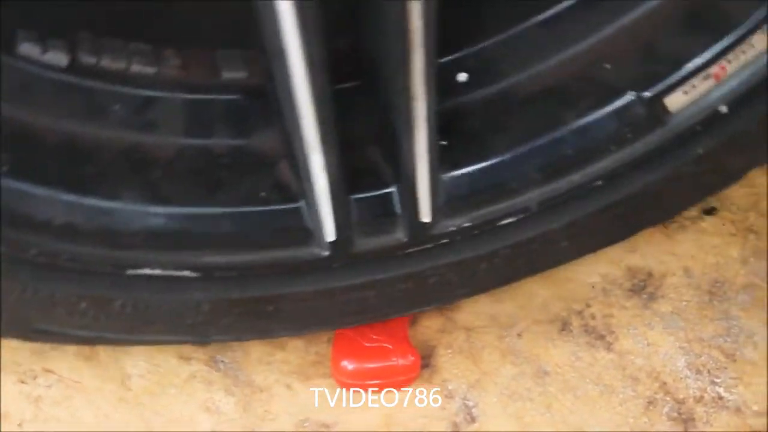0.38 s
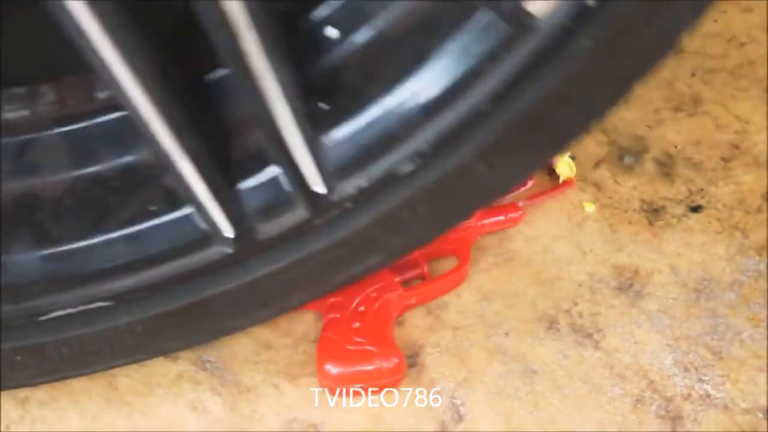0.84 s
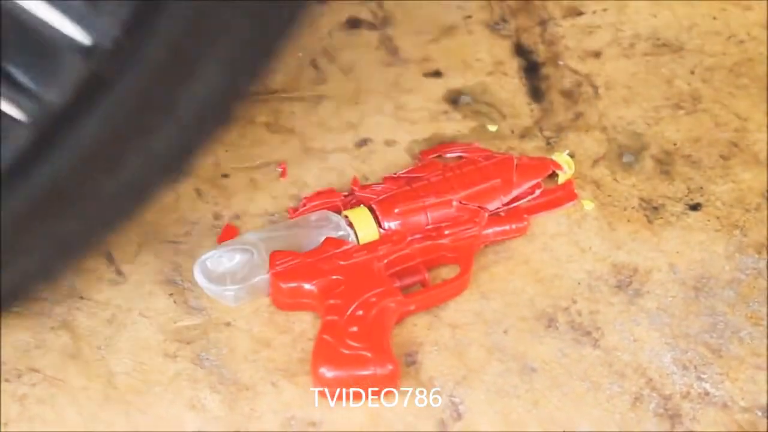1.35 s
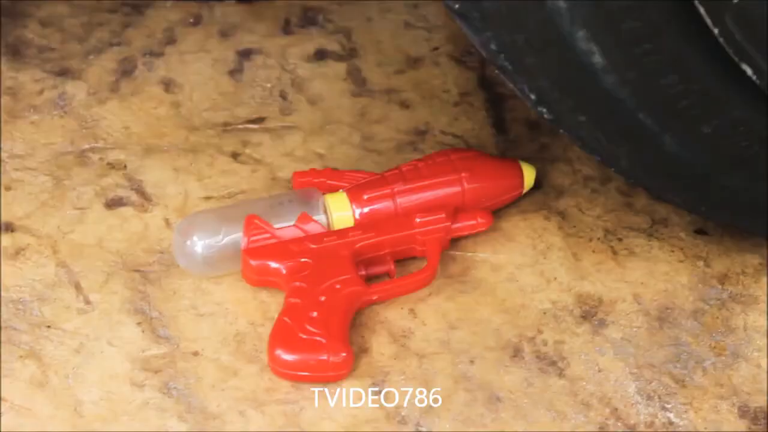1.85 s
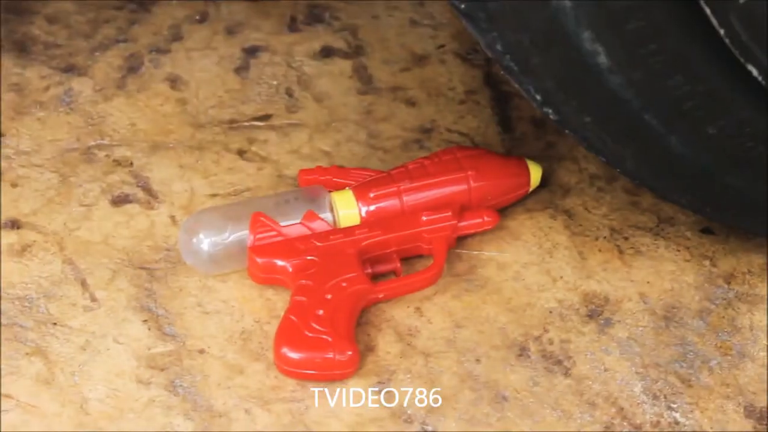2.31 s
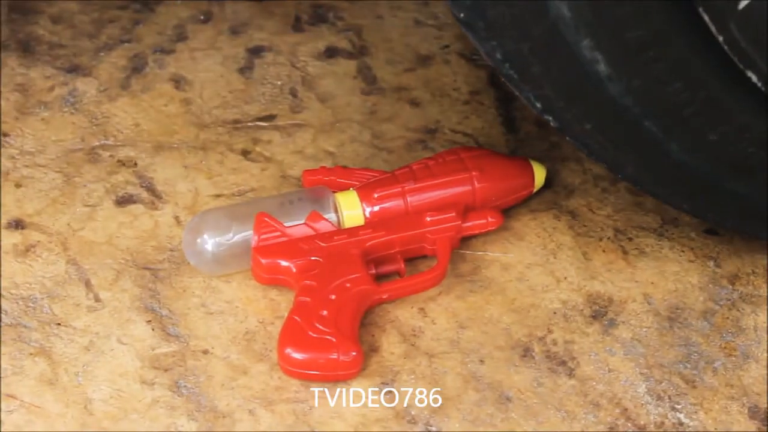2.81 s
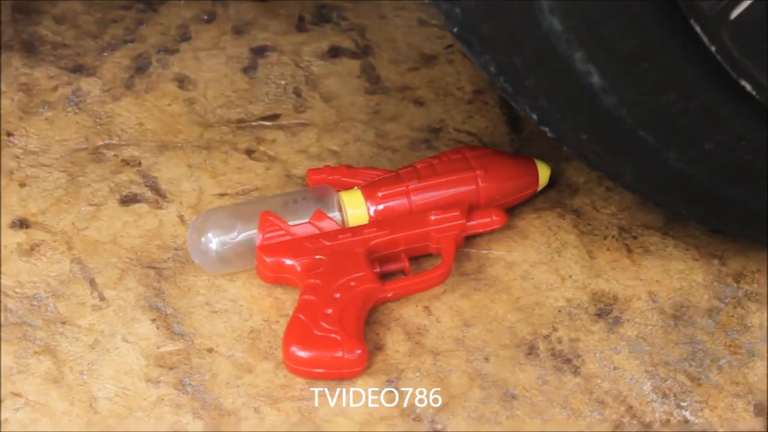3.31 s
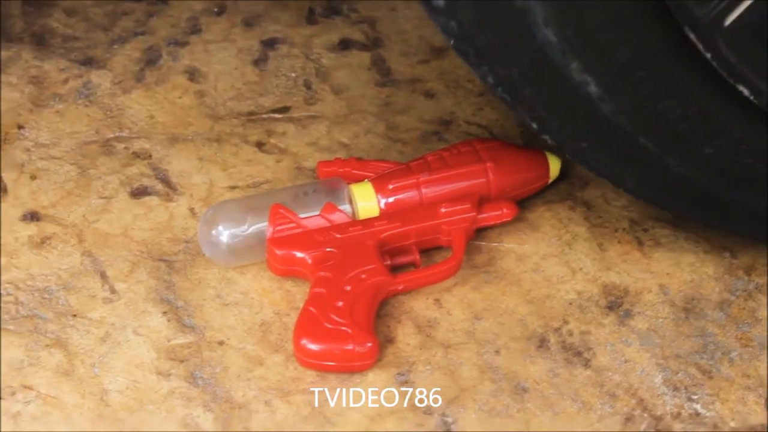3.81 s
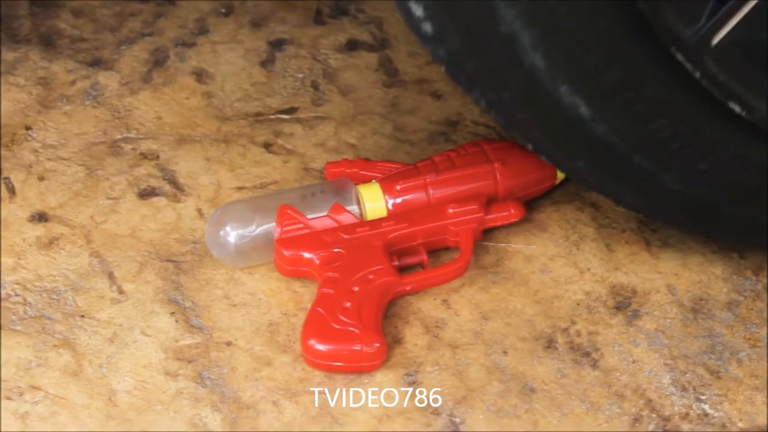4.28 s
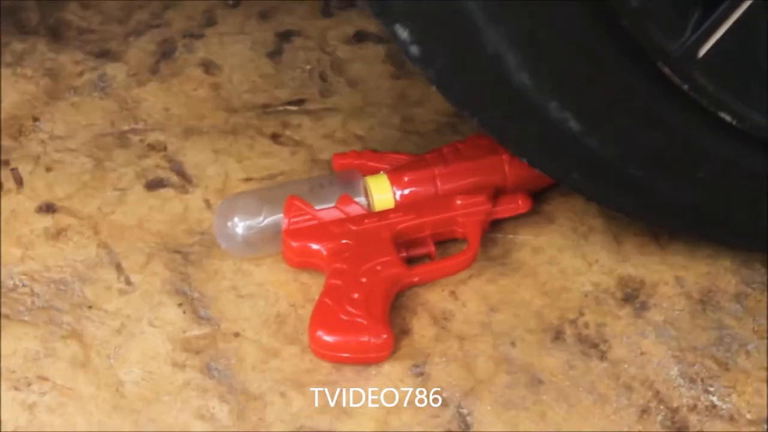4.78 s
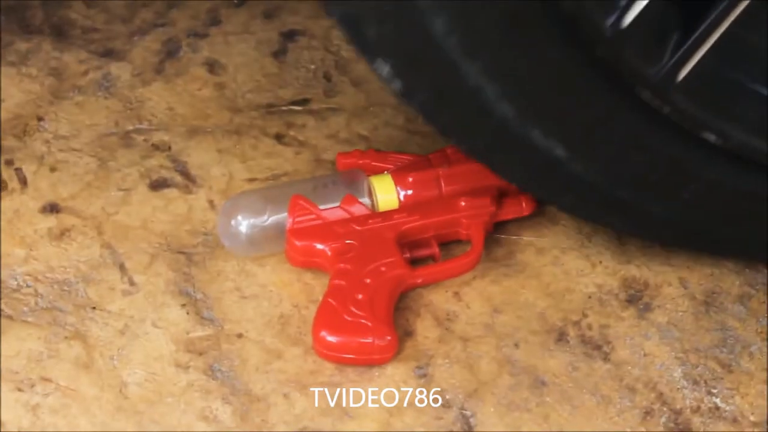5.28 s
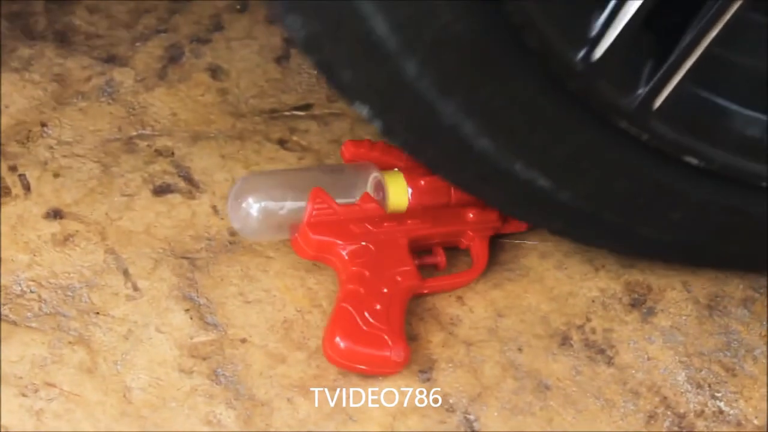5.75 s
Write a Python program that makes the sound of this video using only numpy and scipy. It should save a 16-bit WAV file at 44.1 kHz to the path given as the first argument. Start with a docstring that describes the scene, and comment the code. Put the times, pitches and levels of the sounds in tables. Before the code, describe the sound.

Sharp plastic cracks and rattles over a hissy idling car, a blink of silence, then the same idle slowed to a dark rumble before deep crunches.

```python
"""A hollow plastic toy snaps, crunches and rattles in a yard as an idling car rolls its tyre over it.
After a short silent cut a second crush plays at quarter speed, so engine, fan and cracks sound two octaves lower.
Snaps are noise bursts with ringing pieces; the grind and crackle are many tiny slips and breaks under the tyre.
The engine is shaped noise and wavering tones. The loudest snaps overload the recorder."""
import sys
import numpy as np
from scipy import signal
from scipy.fft import rfft, irfft, next_fast_len
from scipy.io import wavfile
from scipy.ndimage import uniform_filter1d, map_coordinates

SR = 44100
rng = np.random.default_rng(int(sys.argv[2]) if len(sys.argv) > 2 else 0)


def nominal_scale(level):
    """Amplitude ratio for a level in decibels (scalar or array-like)."""
    x = np.asarray(level, float) / 20
    return 10 ** x


def log_audio(samples):
    """Write samples as a 16-bit WAV file to the path given in sys.argv[1]."""
    # one column per channel
    frames = np.atleast_2d(samples).T
    # limit to full scale, then quantise
    limited = np.clip(frames, -1, 1)
    pcm = np.round(limited * 32767).astype(np.int16)
    wavfile.write(sys.argv[1], SR, pcm)


N = 270333  # length in samples

# the two shots: (start [s], end [s], playing speed [1 = full])
SHOT_TIMES = [(0, 1.812, 1), (1.876, 6.2, .25)]
# resonances of each shot's toy as heard: (pitch [Hz], width [Hz], relative level [dB])
SHELL_MODES = [
    [(499.4, 27, -3), (1034, 100, 3), (1270, 230, 0), (1548, 130, 3), (2100, 230, 2), (2583, 440, 5),
     (3786, 1100, -19.5), (4744, 120, -19.5), (6780, 1500, -20)],
    [(540, 78.8, -12.5), (764, 150, -1), (930, 200, 0.5), (1230, 140, -4), (1800, 500, -12),
     (2500, 190, -8), (2800, 340, -10), (3800, 640, -12.5), (4614, 380, -21.5)],
]


def unit(x):
    """Scales x to an rms of 1."""
    return x / np.sqrt(np.mean(x ** 2) + 1e-20)


def along(points, hz):
    """Reads a curve of (pitch [Hz], value) points on a logarithmic pitch axis."""
    point_hz, value = np.transpose(points)
    return np.interp(np.log(hz + 1), np.log(point_hz + 1), value)


def wobble(rate):
    """A smooth random curve through `rate` random points a second."""
    points = rng.standard_normal(int(N * rate / SR) + 4)
    return map_coordinates(points, [np.arange(N) * rate / SR])


def filtered(x, response):
    """Multiplies the spectrum of x by a response that depends on frequency."""
    size = next_fast_len(N + SR // 2)
    spectrum = rfft(x, size) * response(np.fft.rfftfreq(size, 1 / SR))
    return irfft(spectrum, size)[..., :N]


def resonant(x, modes):
    """Lets x shake a set of resonances, which ring on after each push; their signs alternate."""
    def response(f):
        total = 0
        for k, (hz, width, db) in enumerate(modes):
            total = total + (-1) ** k * nominal_scale(db) * 1j * f * width / (hz * hz - f * f + 1j * f * width)
        return total
    return filtered(x, response)


def narrow(hz, width_hz):
    """Noise through one narrow resonance, at rms 1: a breathy hum."""
    return unit(resonant(rng.standard_normal(N), [(hz, width_hz, 0)]))


def tones(hz, overtones, waver_db):
    """Sines at multiples of one pitch curve, each wavering in level on its own."""
    turn = 2 * np.pi * np.cumsum(hz) / SR
    total = np.zeros(N)
    for multiple, db in overtones:
        level = np.sqrt(2) * nominal_scale(db + waver_db * wobble(11.0))  # sqrt(2) turns rms into peak
        total += level * np.sin(multiple * turn + rng.uniform(0, 2 * np.pi))
    return total


def snaps(shot, speed):
    """Each break is a sharp burst of noise whose low part lasts longer; the broken piece rings at its own pitch."""
    # breaks of the shell, per shot, levels before the mix below:
    # (time [s], crack level [dB], treble level [dB], pitch of the piece as heard [Hz], ring level [dB])
    breaks = [
        [(.0374, -16, -3.5, 5224, -33), (.0654, 1.5, 2, 1300, -6), (.0675, -15.5, -16.5, 508, -8.5),
         (.073, -4, 0, 4485, -6), (.0902, -4, -23, 1040, -4), (.0978, -2, -3, 1090, 2),
         (.105, -23, -28, 2090, 2.5), (.112, -35, -29, 1520, 0), (.1155, -21, -30, 620, -16),
         (.119, -23, -31, 2800, -12), (.127, -12, -26, 1140, -12.5), (.133, -24, -30, 1250, -13),
         (.139, -16, -28.5, 995, -12), (.144, -22, -30, 1510, -23), (.15, -18, -34, 1150, 2),
         (.158, -17, -31, 1100, -15), (.1651, -1, -3.5, 1270, -16), (.1665, -20, -22, 510, -8.5),
         (.176, -22, -28, 1270, 3), (.185, -24, -30, 1270, -9), (.204, -16, -16, 9020, -21.5),
         (.2115, -5.5, 4, 5860, -6), (.301, -30, -29, 14000, -30), (.396, -30, -28, 8950, -26),
         (.423, -12, -25, 3500, -17), (.431, -15, -19, 2800, -27.5), (.4485, -9, -13, 4520, -26),
         (.464, -12.5, -29, 4480, -31), (.527, -23, -29, 3220, -22), (.5338, -0.5, -14.5, 1820, -5),
         (.536, -11, -26, 1250, -10.5), (.562, -31, -27, 8500, -21), (.595, -28, -27, 12530, -37),
         (.698, -33, -35, 7060, -35), (.7189, -15, -13.5, 3740, -8.5), (.8281, -10.5, -19, 4480, -16),
         (.8775, -10, -11.5, 6700, -6), (.892, -8.5, -9.5, 3460, -3), (.918, -22, -13, 8200, -15.5),
         (.9219, 5.5, 5, 1920, -0.5), (.926, -8, -21, 2600, -5), (.934, -13, -22, 2520, -8.5),
         (.938, -15, -20, 2550, -6), (.9445, -3, -22, 1900, -11), (.951, -22, -20, 2410, -8.5),
         (.9555, -20, -21.5, 2520, -11.5), (.9587, -11, -19.5, 1800, -4.5), (.9665, -17, -22, 2740, -9.5),
         (.9727, -11, -23, 2580, -8), (.9785, -22, -24, 2550, -9), (.9845, -12, -23, 2500, -9),
         (.9883, 6.5, -5, 4960, 4), (.9888, -12, -16, 2010, -3), (.994, -15, -24, 2600, -15),
         (1.017, -20, -27, 1900, -17.5), (1.023, -11, -14, 11750, -26.5), (1.026, -28, -28.5, 950, -14.5),
         (1.033, -20, -28.5, 2900, -12), (1.09, -28, -23.5, 12100, -35.5), (1.1115, -12, -18, 2050, -2.5),
         (1.117, -26, -35, 2020, -13)],
        [(5.728, -22, -48.5, 1953, -30), (5.743, -27, -51.5, 1500, -24), (5.791, -34, -49.5, 2050, -33),
         (5.803, -21.5, -29, 1536, -20), (5.809, -24, -35, 2950, -30), (5.82, -31, -40, 2100, -25),
         (5.848, -32, -38, 2960, -35), (5.872, -25, -39, 895, -26), (5.894, -17.5, -40, 958, -17.5),
         (5.918, -31.5, -33, 532, -22), (5.982, 9, -10, 902, 14.5), (5.9835, -5, -12, 2760, -3.5),
         (5.9875, -2, -7, 930, 2.5), (5.991, 0, -14, 1357, -3.5), (5.997, -13, -23, 1300, -8.5),
         (6.003, -16, -28, 970, -11), (6.014, -18, -31, 820, -11), (6.024, -23, -30, 700, -11.5),
         (6.033, -17, -26, 800, -10.5), (6.037, -22, -30, 1000, -7), (6.051, -16, -30, 1230, -3),
         (6.0605, -2, -5, 862, 7.5), (6.0635, -3, -15, 880, 0), (6.074, -14, -24, 885, -12),
         (6.082, -17, -20, 820, -8), (6.09, -15, -21, 764, -7), (6.097, -18, -24, 960, -12),
         (6.104, -16, -29.5, 879, -7), (6.111, -18, -25, 1100, -9), (6.119, -18, -30, 930, -8)],
    ]
    # band edges of knock, crack and treble as heard, per shot: (four edges [Hz])
    part_edges = [(380, 1500, 6000, 14500), (100, 500, 2000, 6000)]
    # big, low pieces knock: knock over crack for a 1 kHz piece, its fall an octave up, its lowest value
    knock_at_1k_db, knock_db_per_octave, knock_least_db = 6, 15, -11
    overtone, overtone_db = 1.42, -8.5  # second mode of a piece: pitch ratio and level over the first

    t = np.arange(SR // 8) / SR * speed  # slow play stretches time
    rise = 1 - np.exp(-t / 0.00013)
    t60 = np.array([[.013], [.0052], [.0045]])  # seconds for knock, crack, treble to fall 60 dB at full speed
    parts, rings = np.zeros((3, N + SR)), np.zeros(N + SR)
    for time_s, crack_db, treble_db, hz, ring_db in breaks[shot]:
        octaves = np.log2(hz / speed / 1000)
        knock_db = max(knock_at_1k_db - knock_db_per_octave * octaves, knock_least_db)
        parts_db = np.array([[crack_db + knock_db], [crack_db], [treble_db]])
        noise = rng.standard_normal((4, len(t)))
        start = round(time_s * SR)
        parts[:, start:][:, :len(t)] += rise * nominal_scale(parts_db - 60 * t / t60) * np.sign(noise[:3])

        drift = 0.039 * speed * np.cumsum(noise[3])  # a cracked piece rings impurely
        ring_t60 = 10 * speed / hz + 0.005  # it dies after a like number of cycles
        turn = 2 * np.pi * hz * t / speed + drift
        ring = np.sin(turn) + nominal_scale(overtone_db) * np.sin(overtone * turn)
        rings[start:][:len(t)] += rise * nominal_scale(ring_db - 60 * t / ring_t60) * ring

    edges = part_edges[shot]
    gains = np.sqrt(SR / 2 / np.diff(edges))  # each part keeps its level inside its band
    banded = []
    for k in range(3):
        band = signal.butter(3, edges[k:k + 2], "band", fs=SR, output="sos")
        banded.append(gains[k] * signal.sosfilt(band, parts[k, :N]))
    knock, crack, treble = banded
    hollow = nominal_scale(4) * resonant(knock, SHELL_MODES[shot][:1])  # the lowest resonance answers the knock
    shell = nominal_scale(-3.0) * resonant(crack, SHELL_MODES[shot])
    return nominal_scale(-2) * knock + hollow + crack + treble + rings[:N] + shell


def pressure(shot, speed):
    """Power of low resonances, high resonances and grit: each push rises fast, sags while it holds, then lets go."""
    # pushes of the tyre that grind the shell, per shot:
    # (start [s], length [s], level [dB], share of low resonances [0-1], grit over that level [dB])
    pushes = [
        [(.066, 0.0063, -24, 0.1, 6), (.089, 0.0068, -11.5, 0.44, -16), (.101, 0.078, -17.5, 0.26, -24.5),
         (.167, 0.047, -24.5, 0.6, -3), (.213, 0.071, -25.5, 0.8, -8.5), (.29, 0.1, -43, 0.5, -22),
         (.42, 0.096, -29, 1, -9), (.534, 0.0035, -16, 0.86, -11), (.545, 0.037, -31, 0.8, -10),
         (.585, .13, -46, .3, -9.5), (.72, .1, -38.5, 0.3, -8), (.83, 0.1, -32.5, 0.6, -2),
         (.921, 0.07, -15.5, 0.25, -9), (.997, .06, -22, 0.56, -10), (1.06, 0.048, -29, 0.6, -10),
         (1.112, 0.0025, -18, 0.9, -15), (1.185, 0.074, -31.5, 0.8, -35)],
        [(5.72, 0.08, -35, 1, -29.5), (5.801, 0.16, -40, 0.5, -6.5), (5.89, 0.021, -33.5, 0.7, -14),
         (5.982, 0.002, -10, 0.17, -10), (5.99, .17, -19, 0.5, -10.5)],
    ]
    attack_s = 0.002
    sag_db_per_s, release_db_per_s = 50, 449  # the sag is at full speed, the release as heard

    start, length, db, low_share, grit_db = np.transpose(pushes[shot])[..., None]
    since = np.arange(N) / SR - start
    sag_db = sag_db_per_s * speed * np.clip(since, 0, length)
    release_db = release_db_per_s * np.maximum(since - length, 0)
    power = (np.clip(since / attack_s, 0, 1) * nominal_scale(db - sag_db - release_db)) ** 2
    low_share = np.clip(low_share, 0, 1)
    shares = (low_share, 1 - low_share, nominal_scale(grit_db) ** 2)
    return [np.sum(share * power, axis=0) for share in shares]


def crush(shot, speed):
    """Dense tiny slips of uneven size under the tyre shake the shell and grind as bright grit."""
    low_gain, high_gain, grit_gain = np.sqrt(pressure(shot, speed))
    happens = rng.random(N) < 2500 * speed / SR  # 2500 slips a second at full speed
    slips = happens * nominal_scale(2.5 * rng.exponential(size=N)) * rng.standard_normal(N)
    slips = np.clip(unit(slips), -9, 9) + 0.69 * rng.standard_normal(N)

    modes = SHELL_MODES[shot]
    low = unit(resonant(slips, modes[:4]))  # the first four resonances count as low
    high = unit(resonant(slips, modes[4:]))
    grit_hz, grit_width_hz = [6500, 3200][shot], [4200, 4500][shot]
    grit = unit(resonant(slips + .4 * rng.standard_normal(N), [(grit_hz, grit_width_hz, 0)]))
    flutter = nominal_scale(1.4 * wobble(240 * speed))
    return flutter * (low_gain * low + high_gain * high + grit_gain * grit)


def crackle(shot, speed):
    """Small fragments break at random while the tyre pushes; each rings a few cycles at its own pitch."""
    per_s = 600  # fragments a second as heard
    middle_hz, spread_octaves = [2800, 1596][shot], 1.3  # pitch as heard, at most this far up or down
    cycles_to_die = 13  # cycles to fall 60 dB
    level_db, scatter_db = -4, 1  # least level over the push, mean random extra

    draw = rng.random((int(per_s * N / SR), 4))
    start = (draw[:, 0] * N).astype(int)
    octaves = spread_octaves * (draw[:, 1] + draw[:, 2] - 1)
    hz = middle_hz * 2 ** octaves[:, None]
    push = np.sqrt(sum(pressure(shot, speed)))
    size = push[start] * nominal_scale(level_db - scatter_db * np.log(1 - draw[:, 3]))

    k = np.arange(SR // 100)
    cycles = hz * k / SR
    grains = size[:, None] * nominal_scale(-60 * cycles / cycles_to_die) * np.sin(2 * np.pi * cycles)
    places = start[:, None] + k
    return np.bincount(places.ravel(), grains.ravel(), N + len(k))[:N]


def bay_air(speed):
    """Air and valve noise at rms 1: noise coloured by the engine bay, its treble flickering in random patches."""
    # colour of the bay at full speed: (pitch [Hz], relative level per Hz [dB])
    bay = [(40, -14), (90, -10.5), (155, -5), (195, -0.5), (500, -1), (900, -4), (1450, -7), (1570, -5.5),
           (1850, -7), (1950, -11), (2350, -8.5), (2700, -9), (4250, -12), (4600, -18.5), (7000, -24.5),
           (10000, -33), (13000, -37.5), (21000, -46.5), (25000, -56.5)]
    patchy_db, patchy_hz = 1.5, 9000  # depth of the patches (rms), full above this pitch at full speed

    z = signal.stft(rng.standard_normal(N), nperseg=512)[2]
    patches = uniform_filter1d(rng.standard_normal(z.shape), size=8, axis=0)
    patches = unit(uniform_filter1d(patches, size=8, axis=1))
    treble = np.clip(np.arange(len(z)) * SR / 512 / speed / patchy_hz, 0, 1)[:, None]
    patchy = signal.istft(z * nominal_scale(patchy_db * treble * patches), nperseg=512)[1][:N]
    return unit(filtered(patchy, lambda hz: nominal_scale(along(bay, hz / speed))))


def engine(shot, speed):
    """Bay noise, a fan tone, firing overtones, hums and a whine; slow play lowers them all."""
    # fan overtones: (multiple of the fan tone, rms level before the tone lift [dB])
    blades = [(1, -36.5), (2, -48.5), (4, -43), (5, -42.5)]
    # firing overtones: (multiple of the firing rate, rms level before the tone lift [dB])
    exhaust = [(1, -54.5), (2, -48), (3, -43), (4, -53.5), (8, -46.5)]
    # narrow hums of the engine bay at full speed: (pitch [Hz], width [Hz], rms level [dB])
    bay_hums = [(1670, 60, -49.5), (2416, 44, -45.5), (2987, 40, -52)]
    # a thin high whine at full speed: (pitch [Hz], width [Hz], rms level [dB])
    whine = (14900, 260, -61)
    roar_db, roar_fade_db_per_s = [-24, -23][shot], 1  # start level; it fades as the car rolls on
    fan_hz, fan_rise_hz_per_s = [167, 170][shot], 2.8  # at full speed: start pitch and climb
    firing_hz = 25.23  # at full speed
    tone_lift_db = [0.1, 2.5][shot]

    elapsed = (np.arange(N) / SR - SHOT_TIMES[shot][0]) * speed
    swell_db = .45 * wobble(24 * speed) + .7 * wobble(90 * speed)
    roar = nominal_scale(roar_db - roar_fade_db_per_s * elapsed + swell_db) * bay_air(speed)
    fan = tones((fan_hz + fan_rise_hz_per_s * elapsed) * speed, blades, waver_db=1.3)
    uneven = 1 + 0.0039 * wobble(4.5)  # the idle is not quite steady
    firing = tones(firing_hz * speed * uneven, exhaust, waver_db=-1.0)
    hums = sum(nominal_scale(db) * narrow(hz * speed, width_hz * speed) for hz, width_hz, db in bay_hums + [whine])
    return roar + nominal_scale(tone_lift_db) * (fan + firing) + hums


def yard(x, speed):
    """Each frequency of the walls' answer dies at its own pace, stretched by slow play."""
    # answer of the walls at full speed: (pitch [Hz], time to fall 60 dB [s])
    wall_decay = [(300, 0.19), (2000, 0.41), (10000, 0.051)]
    hz, t, z = signal.stft(rng.standard_normal(SR), SR, nperseg=256)
    t60 = along(wall_decay, hz / speed)[:, None]
    tail = signal.istft(z * nominal_scale(-60 * t * speed / t60), SR, nperseg=256)[1]
    return signal.fftconvolve(x, tail / np.linalg.norm(tail))[:N]


def scene():
    """Both shots one after the other, with silence at the cut."""
    out, t = np.zeros(N), np.arange(N) / SR
    for shot, (start, end, speed) in enumerate(SHOT_TIMES):
        breaks = snaps(shot, speed)
        echo = nominal_scale([-10, -12][shot]) * yard(breaks, speed)
        sound = breaks + crush(shot, speed) + crackle(shot, speed) + engine(shot, speed) + echo
        top_hz = min(15900, 24900 * speed)  # slow play lowers the upper limit too
        sound = filtered(sound, lambda hz: np.clip((top_hz - hz) / 400, 0, 1) ** 2)
        fade_in = np.clip((t - start) / .001 + .5, 0, 1)
        fade_out = np.clip((end - t) / .001, 0, 1)
        out += fade_in * fade_out * sound
    return out[None]


def low_pass(x):
    """Removes everything above the highest recorded frequency."""
    return signal.sosfilt(signal.butter(12, 16460, fs=SR, output="sos"), x)


def record(dry):
    """Gain control pulls the level down shortly after loud moments; the sharpest snaps still hit the ceiling."""
    memory = np.exp(-1 / (.04 * SR))  # the level is averaged over about 40 ms
    power = signal.lfilter([1 - memory], [1, -memory], np.minimum(dry ** 2, 1))
    power_db = 10 * np.log10(power + 1e-12)
    ducked = dry * nominal_scale(-.35 * np.maximum(power_db + 17.5, 0))  # acts above -17.5 dB
    clipped = ducked / (1 + np.abs(ducked / .99) ** 16) ** (1 / 16)
    mix = filtered(clipped, lambda hz: hz ** 2 / (hz ** 2 + 14 ** 2))  # the deepest bass is blocked
    return low_pass(mix)


dry = scene()
out = record(dry)
log_audio(out)
```